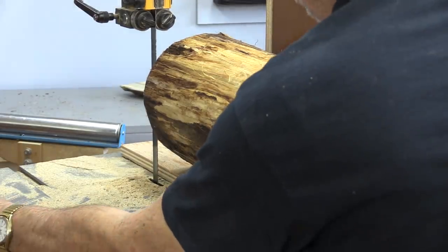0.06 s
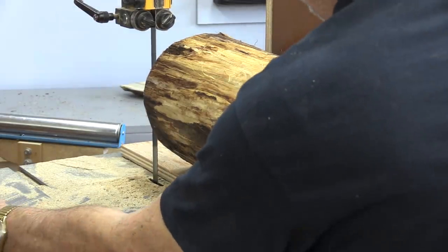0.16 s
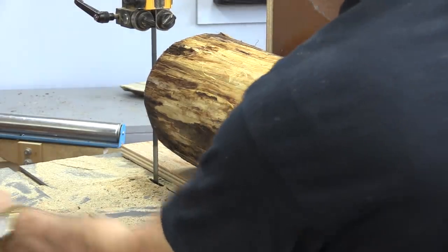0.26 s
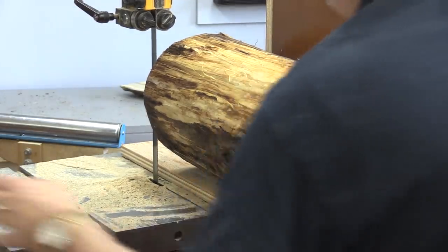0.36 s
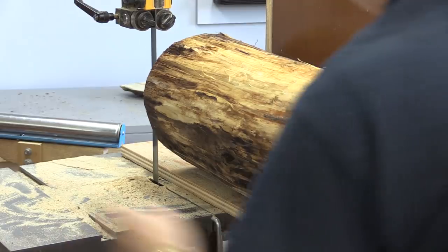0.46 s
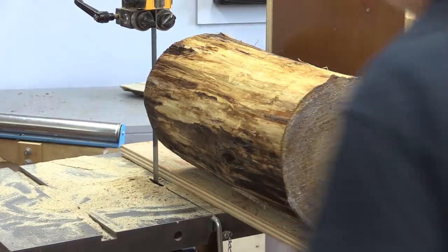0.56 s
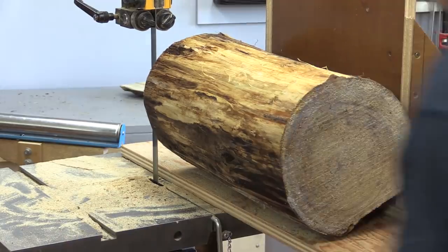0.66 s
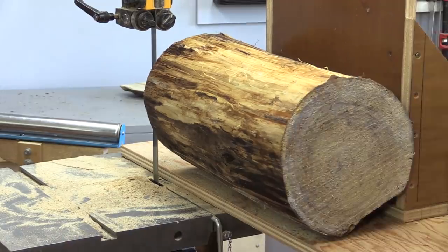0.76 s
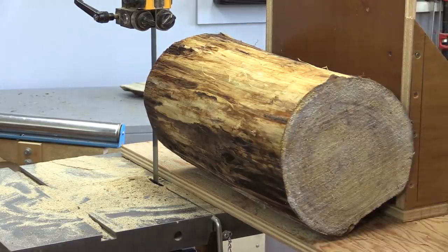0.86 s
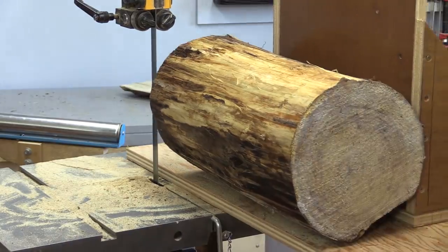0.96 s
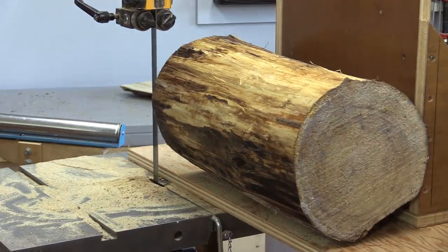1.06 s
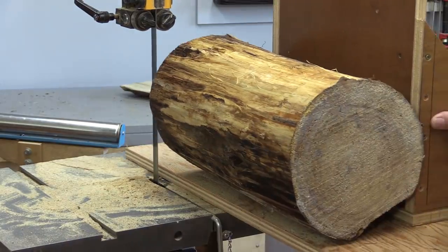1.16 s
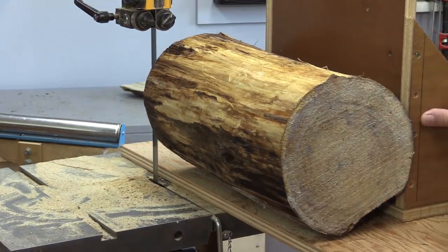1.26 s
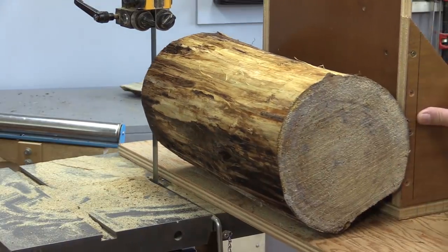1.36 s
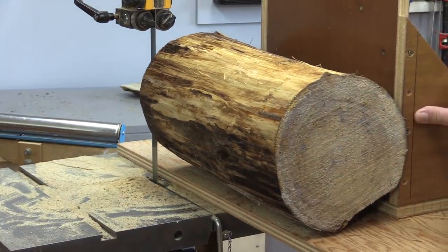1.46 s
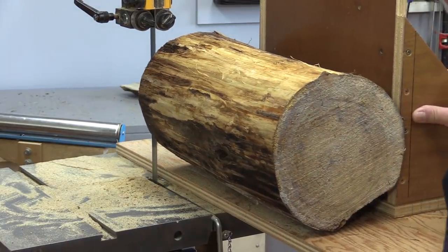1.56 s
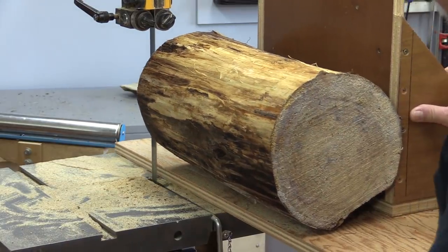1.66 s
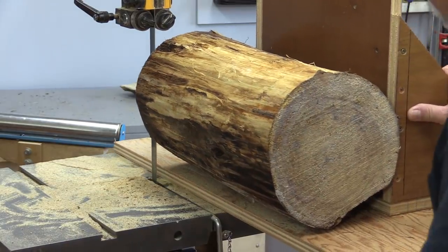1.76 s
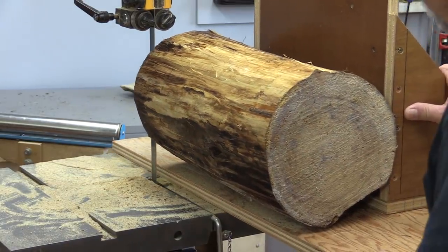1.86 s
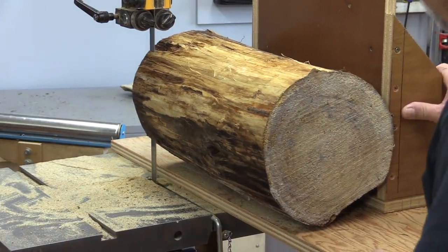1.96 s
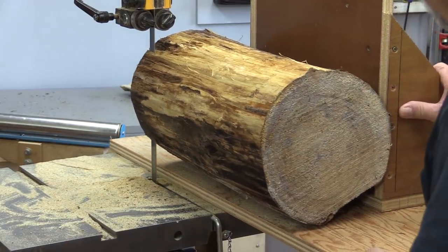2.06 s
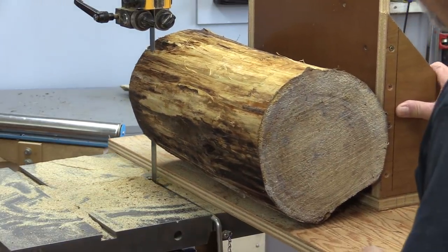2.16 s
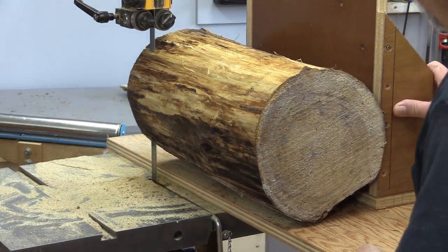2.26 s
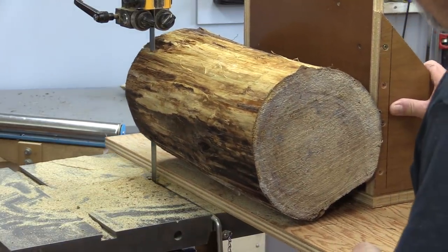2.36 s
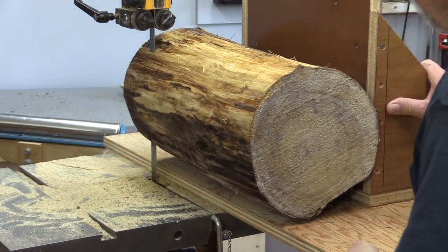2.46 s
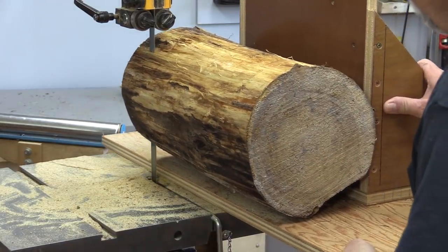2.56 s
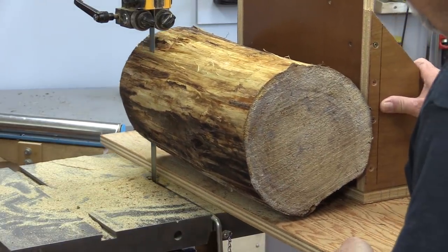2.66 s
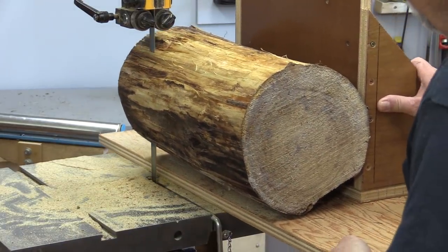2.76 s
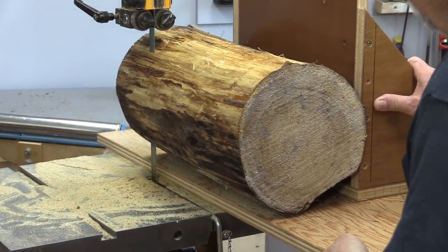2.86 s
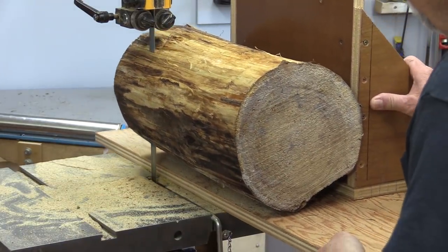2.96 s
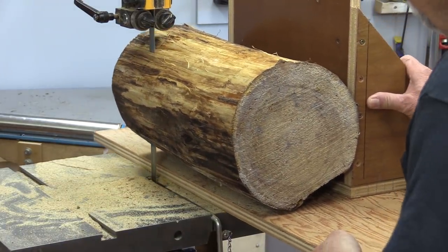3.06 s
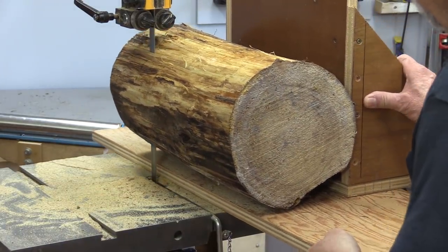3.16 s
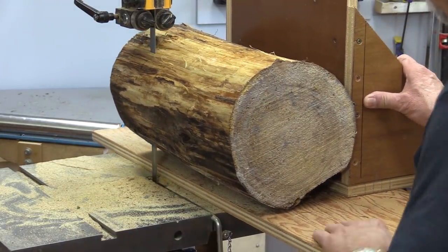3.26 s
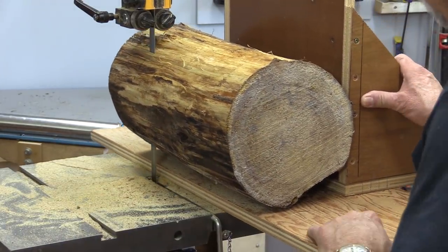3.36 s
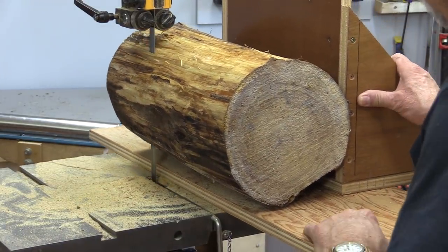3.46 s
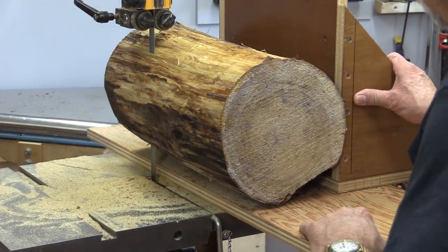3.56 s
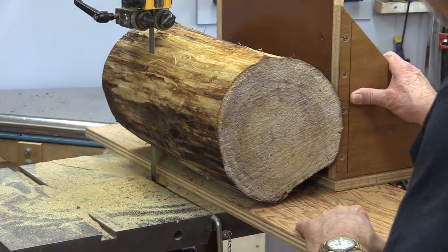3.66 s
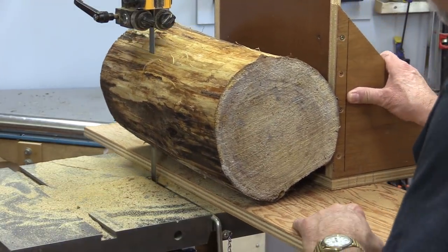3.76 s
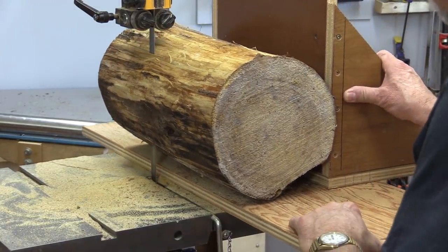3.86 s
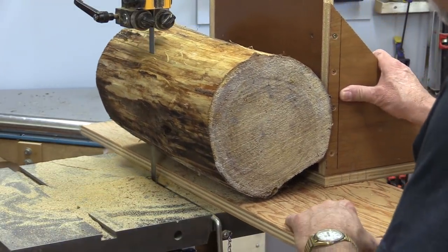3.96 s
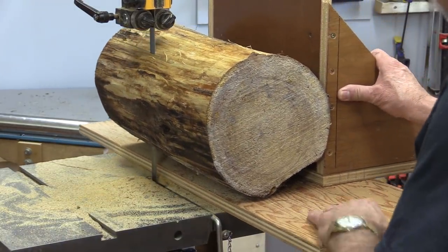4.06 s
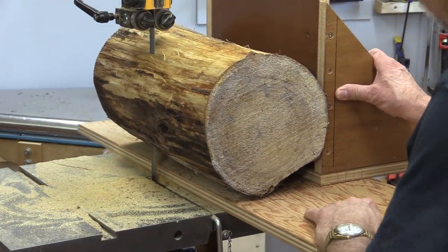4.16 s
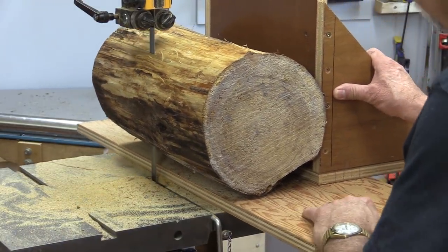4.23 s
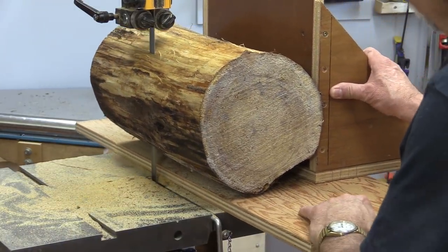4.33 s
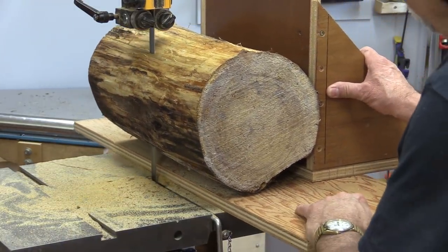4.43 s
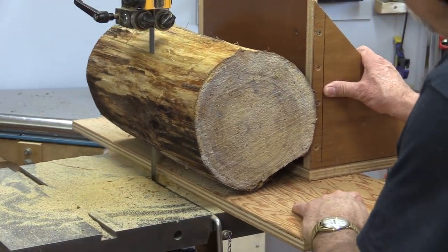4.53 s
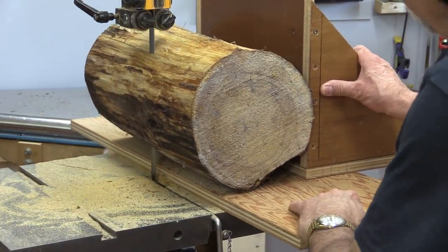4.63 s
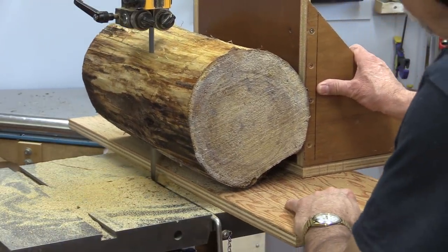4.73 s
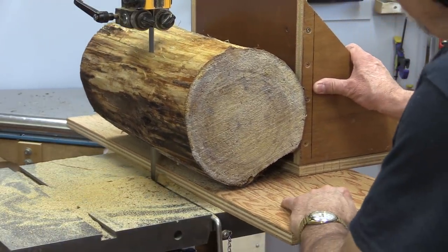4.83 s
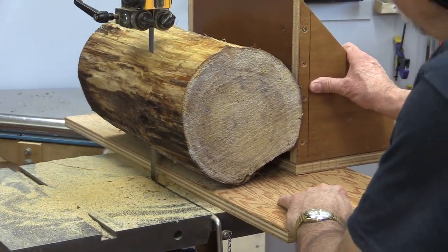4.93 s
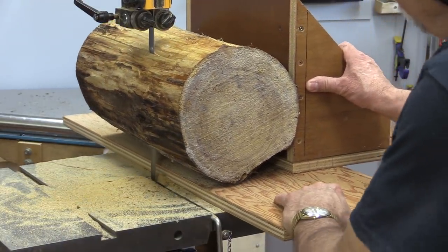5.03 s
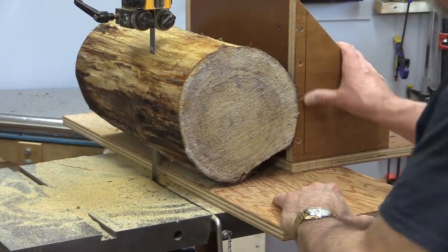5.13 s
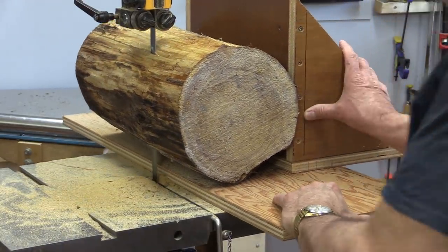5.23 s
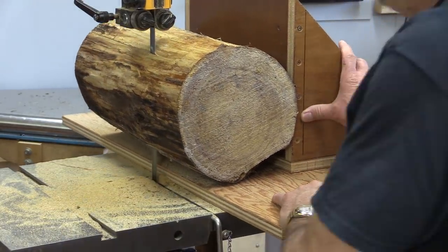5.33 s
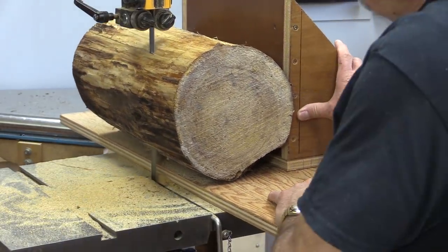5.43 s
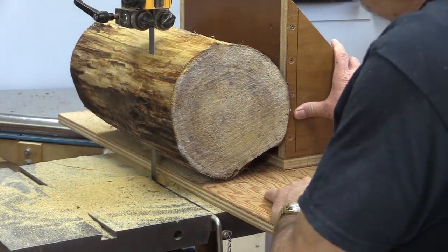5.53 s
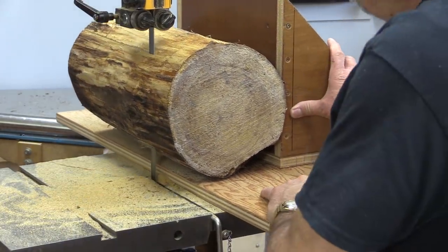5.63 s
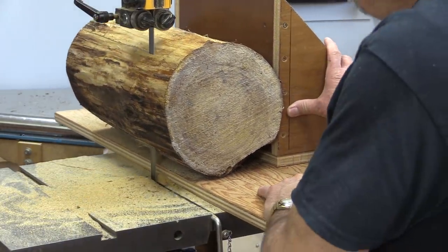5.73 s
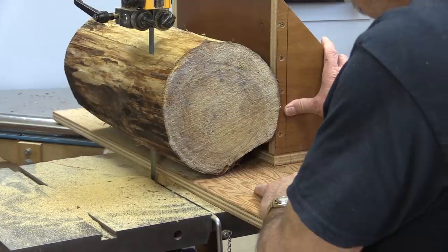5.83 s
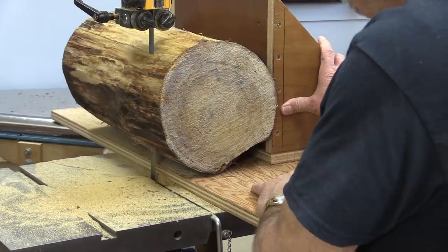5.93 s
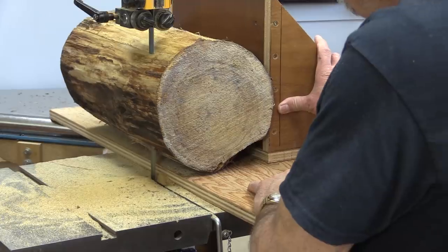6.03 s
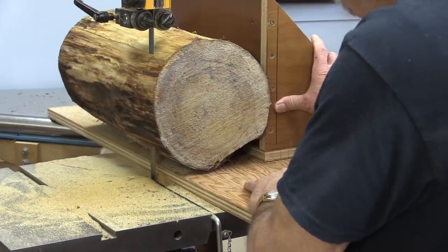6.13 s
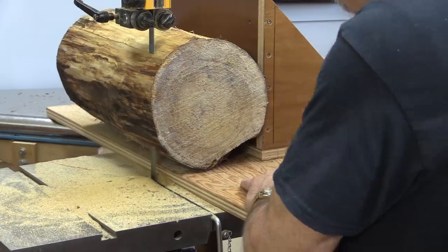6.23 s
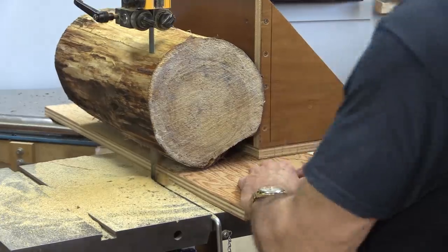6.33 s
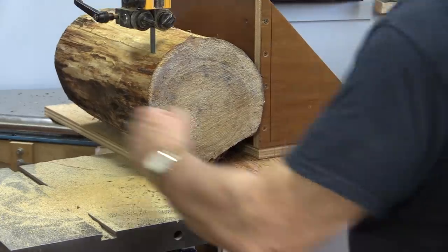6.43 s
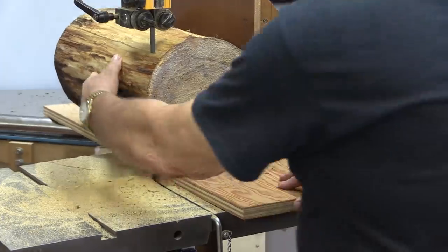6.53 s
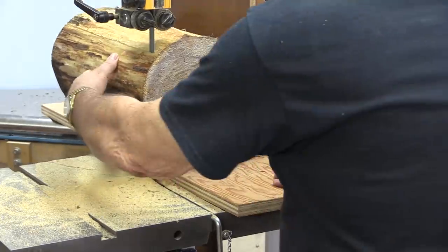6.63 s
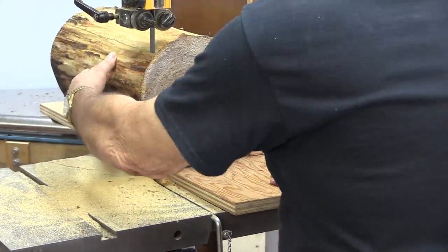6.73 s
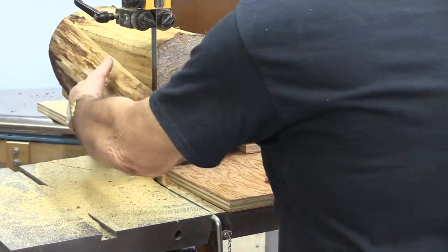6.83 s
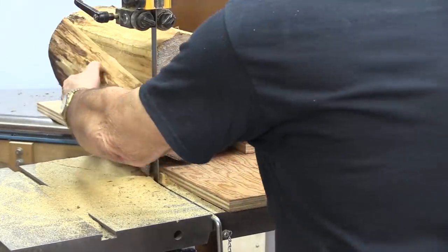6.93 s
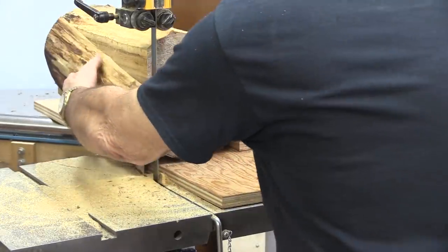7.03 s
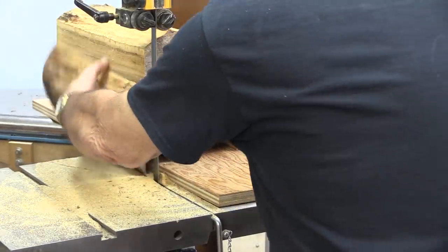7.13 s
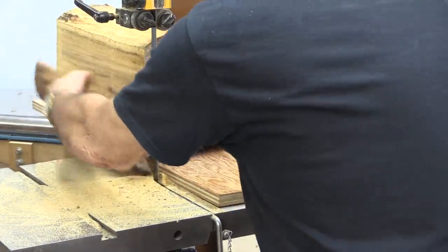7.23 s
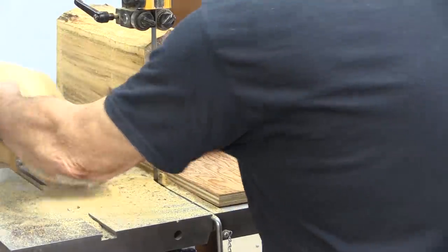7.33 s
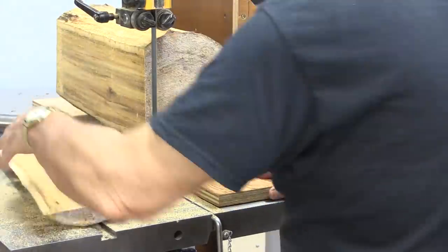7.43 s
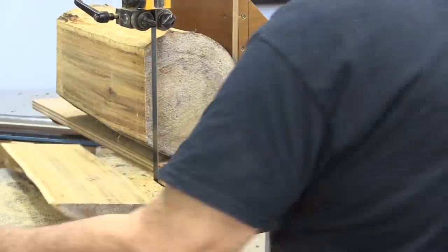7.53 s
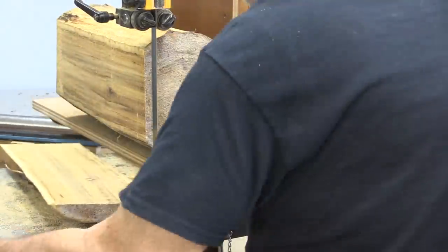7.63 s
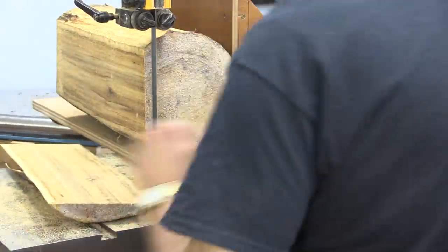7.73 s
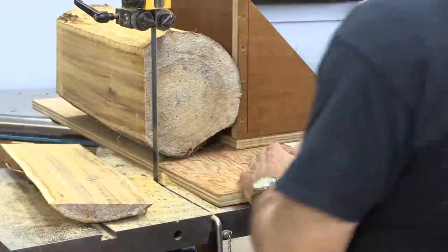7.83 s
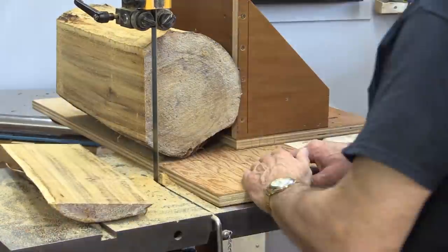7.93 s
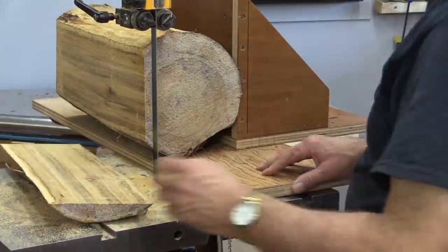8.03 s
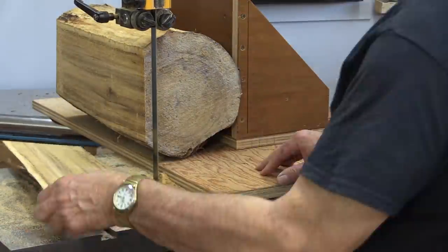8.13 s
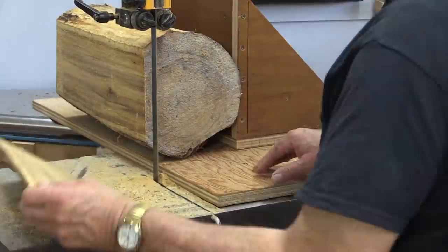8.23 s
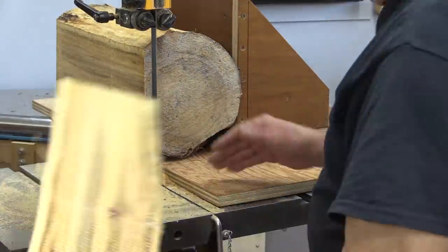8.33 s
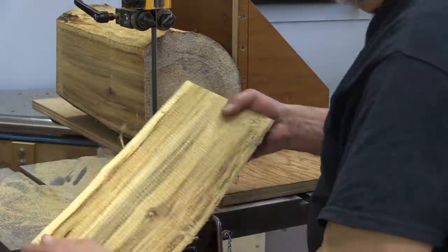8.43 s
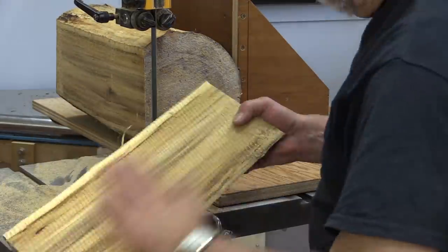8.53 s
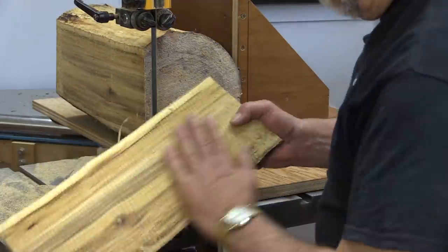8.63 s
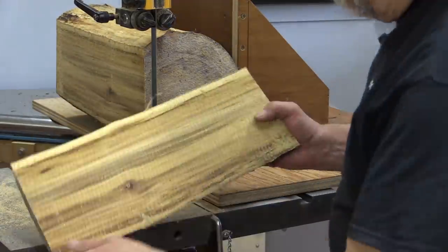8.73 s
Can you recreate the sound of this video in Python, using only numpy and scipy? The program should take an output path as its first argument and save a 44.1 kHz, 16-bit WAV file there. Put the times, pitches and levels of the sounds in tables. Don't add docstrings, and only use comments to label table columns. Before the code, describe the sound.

Switch clack, frame shudder, then a fast-forward bandsaw rip: bark snags, piercing metallic squeal, chatter and hiss, ending in a free whir and extractor whine.

```python
import sys
import numpy as np
from scipy import signal
from scipy.io import wavfile
from scipy.ndimage import uniform_filter1d

SR = 44100
rng = np.random.default_rng(int(sys.argv[2]) if len(sys.argv) > 2 else 0)


def wav_out(sig):
    wavfile.write(sys.argv[1], SR, np.round(np.clip(np.atleast_2d(sig).T, -1, 1) * 32767).astype(np.int16))


def field_ratio(decibels):
    return 10 ** (np.asarray(decibels, dtype=float) / 20)


N = 387638
T = np.arange(N) / SR
FAST_FROM_S = .995
SQUEAL_FROM_S, SEATED_S, SETTLED_S, SQUEAL_TO_S = 1.38, 2.18, 3.7, 6.875


def evened(x):
    return x / np.sqrt(np.mean(x ** 2) + 1e-20)


def read(points, hz):
    f, value = np.transpose(points)
    return np.interp(np.log(hz + 1), np.log(f + 1), value)


def columns(rows):
    s, *values = np.transpose(rows)
    gate = np.clip(np.minimum(T - s[0], s[-1] - T) / .004, 0, 1)
    return [gate] + [np.interp(T, s, v) for v in values]


def spell(start, end, edge_s):
    return np.sin(np.pi / 2 * np.clip(np.minimum(T - start, end - T) / edge_s, 0, 1)) ** 2


def spells_db(rows, edge_s):
    return sum(db * spell(start, end, edge_s) for start, end, db in rows)


def along(start, end, first, last):
    return np.interp(T, [start, end], [first, last])


def drift(rate_hz):
    step = 64
    lowpass = signal.butter(2, rate_hz, fs=SR / step, output="sos")
    slow = signal.sosfilt(lowpass, rng.standard_normal(N // step + 2))
    return np.interp(np.arange(N) / step, np.arange(len(slow)), evened(slow))


def noise(colour, patchy_db, size=1024):
    frames, hz = N // (size // 4) + 5, np.fft.rfftfreq(size, 1 / SR)
    a, b, patches = rng.standard_normal((frames, len(hz), 3)).T
    patches = uniform_filter1d(patches, size=12, axis=0)
    patches = evened(uniform_filter1d(patches, size=10, axis=1))
    z = (a + 1j * b) * field_ratio(read(colour, hz)[:, None] + patchy_db * patches)
    return evened(signal.istft(z, nperseg=size, noverlap=size * 3 // 4)[1][:N])


def resonate(x, hz, width):
    turn = np.exp(2j * np.pi * np.cumsum(hz * np.ones(len(x))) / SR)
    r = np.exp(-np.pi * abs(width) / SR)
    return 2 * (turn * signal.lfilter([1 - r], [1, -r], x / turn + 1e-18)).real


def fuzzy(hz, width):
    return evened(resonate(resonate(rng.standard_normal(N), hz, width), hz, width))


def tone(hz, db, waver_hz, waver_db, rate_hz):
    turns = np.cumsum(hz + waver_hz * drift(rate_hz)) / SR + rng.random()
    return np.sqrt(2) * field_ratio(db + waver_db * drift(rate_hz)) * np.sin(2 * np.pi * turns)


def thin(x, low_hz):
    return signal.sosfilt(signal.butter(4, low_hz, "high", fs=SR, output="sos"), x)


def add(mix, s, sound):
    part = mix[round(s * SR):][:len(sound)]
    part += sound[:len(part)]


# start_s, end_s, rise_hz, swell_db
EASES = [
    (3.26, 3.47, 38, 2),
    (4.12, 4.28, 36, 4),
    (5.16, 5.48, 42, 3),
    (6.4, 6.68, 36, 1),
    (6.74, 6.97, 10, 1),
]
EASE_S = .075
# start_s, end_s, depth_db
BREAKS = [
    (5.16, 5.22, -7),
    (5.38, 5.46, -10),
    (6.57, 6.67, -11),
]
# pitch_hz, pitch_hz
BARK_HZ = (2728, 2690)
SEATED_HZ, SETTLED_HZ = 2676, 2658
# level_db of order 1, 2, 3, 4
BARK_DB = (-53, -79, -49, -61)
SEATED_DB = (-42.5, -50, -38.5, -49.5)
DEEP_DB = (-41, -47.5, -45.5, -48.5)
# start_s, end_s, gain_db
ORDER_SPELLS = [
    [(2.16, 3.03, -6.5), (3.05, 3.2, 3), (3.25, 3.56, -4), (4.09, 4.16, -17), (4.15, 4.27, 1.5),
     (5.2, 5.42, 1.5), (5.43, 5.76, 6), (5.73, 6.3, 2.5), (6.44, 6.74, -3), (6.73, 6.9, 6), (6.77, 6.83, 4)],
    [(2.18, 2.3, 7.5), (2.28, 2.6, 3.5), (3.05, 3.55, 2), (3.55, 3.93, -4), (3.95, 4.3, 8),
     (4.36, 4.62, 7.5), (4.8, 5.2, -5), (5.2, 5.42, 6.5), (5.46, 5.53, 9), (5.58, 5.76, 7), (6.3, 6.9, 6.5)],
    [(2.14, 2.36, 6), (3.1, 3.5, 8), (4.3, 5.4, 5.5), (6.4, 6.82, 3.5)],
    [(2.18, 2.98, 5), (2.98, 3.25, -3), (3.42, 3.95, -5), (4.3, 5.15, -5), (5.45, 6.4, -5),
     (6.4, 6.62, -10), (6.68, 6.9, 0)],
]
# start_s, end_s, gain_db
FIFTH = [
    (2.18, 2.481, 4),
    (2.501, 3.2, -8),
    (3.5, 4.049, 1),
    (4.047, 4.351, 5),
    (4.7, 5.15, -6),
    (5.45, 6.699, 2),
]


def squeal_pitch():
    times = [SQUEAL_FROM_S, SEATED_S - .04, SEATED_S, SETTLED_S]
    hz = np.interp(T, times, [*BARK_HZ, SEATED_HZ, SETTLED_HZ])
    hz = hz + 3.55 * drift(44.3) + 4 * drift(2.55)
    return hz + sum(rise_hz * spell(start, end, EASE_S) for start, end, rise_hz, _ in EASES)


def squeal_levels():
    swell_db = sum(db * spell(start, end, EASE_S) for start, end, _, db in EASES)
    swell_db = swell_db + sum(db * spell(start, end, .4 * (end - start)) for start, end, db in BREAKS)
    times = [SEATED_S - .04, SEATED_S, SEATED_S + 1]
    orders = []
    for stages, spells in zip(zip(BARK_DB, SEATED_DB, DEEP_DB), ORDER_SPELLS):
        orders.append(np.interp(T, times, stages) + swell_db + spells_db(spells, .033))
    orders.append(orders[-1] - 4.0 + spells_db(FIFTH, .055))
    return [db + (k + 1) * .35 * drift(14) for k, db in enumerate(orders)]


# start_s, end_s, pitch_hz, top_db
SIDE_MODE = [
    (3.6, 4.12, 5656, -36),
    (4.62, 5.2, 5618, -50),
    (5.42, 5.7, 5650, -50),
    (5.7, 6.45, 5615, -52),
]
# start_s, end_s, pitch_hz, level_db
BEATS = [
    (3.6, 4.12, 3000, -51),
    (5.45, 6.4, 2965, -53),
]
# start_s, end_s, level_db
SUMS = [
    (4.3, 4.749, -52),
    (5.45, 6.449, -49.5),
    (6.447, 6.583, -43),
    (6.64, 6.877, -41),
]


def blade():
    hz, orders = squeal_pitch(), squeal_levels()
    squeal = np.zeros(N)
    for k, db in enumerate(orders):
        squeal += tone((k + 1) * hz, db - 1.4 * k, 1.6, 2.3, 87.0)
        squeal += (.12 + .19 * k) * field_ratio(db) * fuzzy((k + 1) * hz, 26 * (k + 1))
    out = spell(SQUEAL_FROM_S, SQUEAL_TO_S, .011) * squeal

    beating = sum(field_ratio(orders[k] - 1) * fuzzy(k * hz + CHATTER_HZ[-1], 58.7) for k in range(2, len(orders)))
    out += spell(6.69, 6.88, .042) * beating

    side = sum(field_ratio(db) * spell(start, end, .59 * (end - start)) for start, end, _, db in SIDE_MODE)
    pitch_points = [(s, mode_hz) for *span, mode_hz, _ in SIDE_MODE for s in span]
    side_hz = np.interp(T, *np.transpose(pitch_points))
    sum_tone = field_ratio(-8.0) * fuzzy(side_hz + hz, 70)
    out += side * (tone(side_hz, -.88, 11.6, .73, 37.9) + .55 * fuzzy(side_hz, 90) + sum_tone)
    for start, end, beat_hz, db in BEATS:
        out += field_ratio(db) * spell(start, end, .1) * fuzzy(beat_hz, 25)
    sums = sum(field_ratio(db) * spell(start, end, .03) for start, end, db in SUMS)
    return out + sums * fuzzy(hz + CHATTER_HZ[-1], 300) + chatter()


# start_s, pitch_hz, level_db
CLIMB = [(1.3, 2200, -51), (1.6, 2245, -42), (1.68, 2290, -40), (1.78, 2350, -41.5), (1.85, 2470, -40.5),
         (1.93, 2550, -40.5), (2.05, 2520, -41), (2.12, 2486, -37), (2.17, 2270, -45)]
# start_s, end_s, first_db, last_db
CHATTER = [(2.166, 3.301, -40.5, -36), (3.29, 3.41, -42, -44), (3.4, 4.16, -35, -38),
           (4.21, 4.701, -37.5, -30), (4.692, 4.81, -26, -37), (4.821, 5.3, -46.5, -52),
           (5.415, 6.235, -37.5, -39.5), (6.241, 6.309, -35, -34.5), (6.33, 6.389, -34, -34.5),
           (6.416, 6.462, -28, -35), (6.47, 6.568, -40, -45), (6.626, 6.68, -25.5, -32),
           (6.669, 6.716, -40, -30), (6.706, 6.868, -31.5, -23), (6.861, 6.887, -34, -44)]
CHATTER_HZ = (2252, 2255, 2255, 2258, 2258, 2230, 2260, 2220, 2210, 2215, 2310, 2200, 2205, 2208, 2208)


def chatter():
    gate, hz, db = columns(CLIMB)
    level = gate * field_ratio(db)
    for (start, end, first_db, last_db), bout_hz in zip(CHATTER, CHATTER_HZ):
        level = level + spell(start, end, .0077) * field_ratio(along(start, end, first_db, last_db))
        hz = np.where(T > start, bout_hz, hz)
    level = level * field_ratio(.6 * drift(40))

    wheel_hz, gap_at_s, gap_share, depth_db = 23.7, 4.672, .1, -11
    throb_from_s, throb_to_s = 4.4, 4.83
    turn = (wheel_hz * (T - gap_at_s) + .5) % 1 - .5
    throb = field_ratio(depth_db * spell(throb_from_s, throb_to_s, .2) * np.exp(-(turn / gap_share) ** 2))

    most = np.where(T > 6.2, .9, .6 + .25 * spell(throb_from_s, throb_to_s, .1))
    locked = np.clip((20 * np.log10(level + 1e-9) + 41) / 9, 0, most)
    seated = np.clip((T - 2.1) / .08, .6, 1)
    loose = seated * (.3 * fuzzy(hz, 70) + .62 * tone(hz, 0, 38, 2.5, 110))
    loose = loose + (1.25 - .7 * seated) * fuzzy(hz, 230)
    body = np.sqrt(1 - locked) * loose + np.sqrt(locked) * tone(hz, 0, 12.66, .48, 45.4)
    return throb * level * (body + field_ratio(-18.5) * fuzzy(2 * hz, 140))


# start_s, bite_db
CUT = [(1.3, -64), (1.4, -59), (1.63, -54), (1.99, -46), (2.14, -45.5), (2.2, -41), (3.02, -42.5),
       (3.26, -41.5), (4.09, -43.5), (4.59, -41.5), (5.06, -43.5), (5.21, -42.5), (6.35, -43.5),
       (6.54, -41.5), (6.87, -40), (6.88, -57), (6.9, -52)]
# pitch_hz, level_db (per Hz)
CUT_COLOUR = [(290, -100), (500, -15), (649, -65), (944, -14.5), (1240, -11.5), (1390, -65), (1760, -12),
              (2250, 4.5), (2520, -9.5), (2900, -7), (3420, -3), (3780, -9.5), (4950, -10), (6270, -9),
              (7780, -6.5), (9120, -14.5), (15800, -26.5)]
# pitch_hz, width_hz, level_db
KERF = [(4970, 250, -14), (5790, 110, 2), (6400, 240, -15), (7900, 130, 0.5), (7340, 59, 1),
        (8290, 110, 0.5), (8670, 140, 2), (10140, 170, 3), (10540, 200, -22), (12900, 300, -3),
        (13900, 200, -5)]
# start_s, level_db
RING = [(1.4, -64), (1.65, -46), (2.13, -42), (2.2, -32.5), (2.6, -37), (2.98, -38), (3.15, -45),
        (3.3, -38), (3.5, -43), (3.85, -39.5), (4.2, -48), (4.5, -40), (5.0, -43), (5.45, -39), (6.3, -37),
        (6.55, -34), (6.88, -45)]
# start_s, level_db
ENTRY = [(1.45, -51), (1.75, -45), (2.3, -47), (2.7, -50), (4, -53)]
# start_s, end_s, level_db
RASPS = [
    (1.634, 1.66, -48),
    (1.72, 1.8, -47),
    (1.82, 1.904, -47),
    (1.96, 1.998, -42),
    (2.033, 2.15, -48),
]


def cut():
    gate, bite_db = columns(CUT)
    bright_db = -3 + 3 * np.minimum(bite_db + 43, 0) + 20 * np.log10(feed())
    bright_db = bright_db + 2.2 * sum(spell(start, end, EASE_S) for start, end, *_ in EASES)
    easing = sum(spell(start, end, EASE_S) for start, end, *_ in EASES[:3])
    ring_db = columns(RING)[1] - 2 * easing + .67 * drift(25)

    grains = field_ratio(2.8 * np.minimum(rng.exponential(1, N // 16 + 1), 5) / 2).repeat(16)[:N]
    hiss = evened(noise(CUT_COLOUR, 1.2, size=512) * uniform_filter1d(grains, size=12))
    top = signal.sosfilt(signal.butter(2, 9500, "high", fs=SR, output="sos"), hiss)
    hiss = hiss + (field_ratio(bright_db + 12.0) - 1) * top
    rings = evened(sum(field_ratio(db + 1.6 * drift(3.0)) * fuzzy(hz, 2.2 * width) for hz, width, db in KERF))
    sound = field_ratio(bite_db + 7.0) * hiss + field_ratio(bite_db - 1.0) * rings + field_ratio(ring_db - 3.5) * kerf_ring()

    entering, entry_db = columns(ENTRY)
    sound += entering * field_ratio(entry_db) * (fuzzy(3860, 230) + .56 * fuzzy(3560, 900))
    rasp = sum(field_ratio(db) * spell(start, end, .012) for start, end, db in RASPS)
    sound += rasp * field_ratio(3 * drift(60)) * fuzzy(7200, 600)
    return thin(gate * field_ratio(.96 * drift(28)) * sound, 520)


def kerf_ring():
    broad = np.interp(T, [3, 3.5, 4.8, 5.4], [.8, .5, .55, .8]) * fuzzy(3390, 240)
    lower = .55 * tone(3345 + 12 * drift(3), 0, 40, 4, 60)
    upper = .35 * tone(3460 + 15 * drift(3), 0, 50, 4, 60)
    return broad + lower + upper


# start_s (centre), depth_db, length_s
PAUSES = [
    (3.06, -3.5, .03),
    (5.41, -6, .018),
    (6.432, -3, .012),
    (6.6, -9, .026),
]


def feed():
    return field_ratio(sum(db * np.exp(-((T - s) / length) ** 4) for s, db, length in PAUSES))


# start_s, peak_db, pitch_hz, length_s
SNAGS = [(1.38, -30, 8180, 0.024), (1.638, -26, 7200, 0.014), (1.724, -25, 7400, .01),
         (1.743, -24, 7300, 0.01), (1.765, -22, 7600, .008), (1.807, -23, 7500, .008),
         (1.835, -18, 7700, .01), (1.878, -22, 7400, .008), (1.895, -18, 8000, 0.009),
         (1.919, -7.5, 7700, 0.019), (1.961, -11, 7600, 0.013), (2.005, -9, 7600, 0.011),
         (2.042, -19, 7600, .009), (2.063, -23, 7400, .008), (2.097, -14, 7900, 0.011)]
SNAG_ORDERS = [(1, .8), (3, 1), (4, .8), (5, .6), (6, .35)]


def snags():
    out = np.zeros(N)
    for s, db, hz, length in SNAGS:
        u = np.arange(2000) / SR / length
        puff = rng.standard_normal(2000) * np.sqrt(u) * np.exp(-u ** 4)
        ring = sum(share * resonate(puff, hz * k / 3, 400) for k, share in SNAG_ORDERS) + .054 * puff
        add(out, s, field_ratio(db - 12.5) * ring / abs(ring).max())
    return thin(out, 1400)


# start_s, pitch_hz, level_db
SLACK = [(6.592, 2470, -41), (6.603, 2410, -35), (6.625, 2330, -37), (6.64, 2290, -48)]


def slack():
    gate, hz, db = columns(SLACK)
    pair = tone(hz, -2, 15, 1.5, 60) + tone(2 * hz, -8, 40, 1.5, 60)
    return gate * field_ratio(db) * (pair + .3 * fuzzy(2 * hz, 200))


# start_s, level_db
MOTOR = [(1.0, -57), (1.2, -45.5), (5.07, -49), (5.32, -46), (7.17, -42.5), (7.7, -41.5), (7.73, -66),
         (8.0, -46.5), (8.79, -53)]
WHINE = [(1.1, -63), (1.5, -55), (1.72, -46.5), (2.6, -45.5), (3.2, -52), (3.9, -61), (4.15, -52),
         (5.1, -57), (5.3, -47), (5.6, -58), (6.25, -56), (6.4, -43.5), (6.86, -44), (6.92, -47),
         (7.4, -47), (7.84, -56)]
RUSH = [(.997, -52), (1.1, -45), (1.4, -50), (6.9, -43), (7.7, -43.5), (8.3, -48), (8.79, -45.5)]
# pitch_hz, level_db (per Hz)
RUSH_COLOUR = [(250, -62), (450, -11.5), (900, -0.5), (1400, -1.5), (1900, -2.5), (2300, 7), (2700, -1.5),
               (3900, 0), (4800, -7), (7000, -9.5), (9000, -9), (11500, -12.5), (15800, -20)]
# pitch_hz, level_db
FRAME = [(580, -81), (3620, -65.5), (4060, -57), (5030, -60), (5507, -62), (5985, -58.5), (7103, -64)]
# start_s, level_db
RUNNING = [(.995, -10), (1.12, 1), (7.68, -0.5), (7.85, -13)]
# start_s, level_db
TABLE = [(1, -87), (2.9, -84), (3.3, -78), (6.6, -72.5), (8, -82), (8.5, -82), (8.79, -80)]
# start_s, pitch_hz, level_db
RUN_IN = [(.995, 4330, -45), (1.05, 4400, -46), (1.1, 4500, -47), (1.13, 4520, -62)]
RUN_DOWN = [(7.689, 4520, -49), (7.73, 4420, -51), (7.77, 4300, -57), (7.85, 4250, -63)]
# start_s, level_db
SPAN = [(1.0, -59), (1.15, -48.5), (1.6, -54), (2.1, -59), (6.87, -52.5), (6.9, -52), (7.2, -52),
        (8.79, -55.5)]
# pitch_hz, width_hz
SPAN_MODES = [(2085, 160), (2422, 170), (1653.5, 32)]


def saw():
    out = run_up()
    motor_hz = 959.4
    gate, db = columns(MOTOR)
    out += gate * (.55 * tone(motor_hz, db, .58, 2.4, 28.0) + .16 * field_ratio(db) * fuzzy(motor_hz, 28))
    gate, db = columns(RUNNING)
    out += gate * field_ratio(db) * sum(tone(hz, line_db, 2.86, .44, 9.3) for hz, line_db in FRAME)
    gate, db = columns(TABLE)
    out += gate * (tone(309.5, db, 3.7, 2.8, 5.6) + tone(340, db, 3.26, 1.0, 3.7))

    gate, hz, db = columns(RUN_IN)
    upper = fuzzy(hz, 110) + .7 * fuzzy(.88 * hz, 130)
    lower = .8 * fuzzy(.485 * hz, 120) + .6 * fuzzy(.56 * hz, 120)
    out += gate * field_ratio(db) * (upper + lower)
    gate, hz, db = columns(RUN_DOWN)
    out += gate * (tone(hz, db, 5.7, 1.5, 30) + .52 * field_ratio(db) * fuzzy(.5 * hz, 200))

    gate, db = columns(WHINE)
    load = np.interp(T, [1.6, 2.2, SQUEAL_TO_S, SQUEAL_TO_S + .04], [0, 1, 1, 0])
    whine_hz = 4552 - 36 * load + 6 * drift(3.06)
    powered = T < RUN_DOWN[0][0]
    out += gate * powered * tone(whine_hz, db + .37 * drift(.8), 6.1, 1.2, 25)
    gate, db = columns(SPAN)
    out += gate * field_ratio(db) * sum(fuzzy(hz, width) for hz, width in SPAN_MODES)
    gate, db = columns(RUSH)
    return out + gate * field_ratio(db + 1.2 * drift(30)) * noise(RUSH_COLOUR, 1.5)


# pitch_hz, level_db (per Hz)
RUMBLE = [(47, -54), (80, -41), (242, -6.5), (459, -34), (699, -9), (834, -15), (1090, -14), (2260, -27),
          (3290, -22.5), (3750, -28.5), (15800, -44)]
# start_s, end_s, level_db
SHUDDER = [
    (0.29, .75, -54.5),
    (0.783, 1.005, -43.5),
]
# start_s, end_s, from_hz, to_hz, top_db
SWEEPS = [(.48, 0.751, 675.7, 731, -38.5), (.6, 0.79, 1450, 1500, -46.5), (0.75, 0.823, 666, 650, -44),
          (0.788, 0.86, 925, 992, -38), (0.852, 0.922, 930, 983, -43), (0.87, 0.934, 1040, 1110, -42),
          (.92, 1.0, 1075, 1090, -44), (.66, .86, 1357, 1406, -48), (0.892, 1.023, 550, 505, -41)]


def run_up():
    shudder = sum(field_ratio(db) * spell(start, end, .026) * along(start, end, 1.46, .24)
                  for start, end, db in SHUDDER)
    out = noise(RUMBLE, 1.4) * shudder
    for start, end, from_hz, to_hz, db in SWEEPS:
        hz = along(start, end, from_hz, to_hz)
        level = field_ratio(db) * spell(start, end, .16 * (end - start)) * along(start, end, .62, .78)
        out += level * (.47 * fuzzy(hz, 64) + tone(hz, -2, 7.8, 1.6, 30))
    return out * (T < FAST_FROM_S)


# start_s, peak_db
SWITCH_ON = [
    (0.109, -20),
]
SWITCH_OFF = [
    (7.675, -19),
]
# pitch_hz, level_db, t60_s
SWITCH_MODES = [(750, -31, 0.031), (1137, -3, 0.15), (1330, 0.5, 0.081), (1500, -1, 0.071),
                (1870, -25, 0.098), (2121, -25, 0.038), (3020, -21, 0.016), (3820, -13, 0.22)]
# pitch_hz, level_db (per Hz)
CRACK = [(290, -45), (500, -1), (1300, -2.5), (4500, -9.5), (6450, -24), (11800, -17), (15800, -31)]
# start_s, peak_db, pitch_hz, t60_s
KNOCKS = [
    (.767, -24.5, 657, 0.093),
    (.793, -32, 680, 0.076),
    (7.315, -44, 4100, .12),
    (7.468, -33, 2070, .1),
    (7.47, -36, 1690, .1),
    (7.675, -32, 3000, 0.039),
    (7.675, -28, 4840, .04),
]
# start_s, peak_db, pitch_hz (centre)
TICKS = [(0.806, -39, 8000), (.81, -38, 3600), (7.2315, -37, 9700), (7.283, -38, 10500),
         (7.2885, -28, 9480), (7.311, -27.5, 9500), (7.312, -31, 6200), (7.3537, -36, 8560),
         (7.4766, -30, 9400), (7.7174, -34, 9600), (7.8194, -38, 9360), (7.9848, -35, 9170),
         (8.079, -37, 8570), (8.11, -39, 8740), (8.4265, -37, 8820)]


def clicks():
    out, t = np.zeros(N), np.arange(8192) / SR
    body = sum(field_ratio(db - 60 * t / t60) * np.sin(2 * np.pi * hz * t) for hz, db, t60 in SWITCH_MODES)
    body = body / abs(body).max()
    crack = noise(CRACK, 0)[:8192] * (field_ratio(-60 * t / .024) + field_ratio(-3.5 - 60 * t / .25))
    for s, db in SWITCH_ON:
        add(out, s, field_ratio(db) * (.69 * body + .27 * crack))
    for s, db in SWITCH_OFF:
        fast = (.98 * body + .35 * crack)[::4] + .14 * crack[::2][:2048]
        add(out, s, field_ratio(db) * thin(fast, 800))
    for s, db, hz, t60 in KNOCKS:
        add(out, s, field_ratio(db - 60 * t / t60) * np.minimum(t / .0012, 1) * np.sin(2 * np.pi * hz * t))
    for s, db, hz in TICKS:
        puff = rng.standard_normal(8192)
        tick = resonate(puff, hz, 2200) + .6 * resonate(puff, 1.38 * hz, 2200) + .12 * puff
        tick = thin(tick, .3 * hz) * field_ratio(-60 * t / .06)
        add(out, s, field_ratio(db) * tick / abs(tick).max())
    return thin(out, 140)


# pitch_hz, level_db (per Hz)
AIR_SLOW = [(24, -60), (40, -33), (85, -41), (114, -24), (147, -12.5), (289, -7.5), (476, -8), (693, -5.5),
            (935, -13.5), (1090, -10), (1170, -15.5), (1580, -14.5), (1980, -18.5), (2420, -22),
            (15800, -48.5)]
AIR_FAST = [(71, -88), (120, -68), (226, -24.5), (272, -80), (333, -18.5), (400, -27.5), (540, -3.5),
            (667, -34), (709, -24), (754, -14.5), (802, -1.5), (1390, -5.5), (1540, -3), (2900, -8),
            (3280, -9), (8560, -13.5), (15800, -25.5)]
# pitch_hz, level_db
TONES_SLOW = [(296.1, -60), (355.3, -53.5), (624.5, -53), (709.4, -43.5), (1330, -67), (1534, -65),
              (2121, -67), (2460, -67)]
TONES_FAST = [(236.9, -73.5), (473.7, -64), (710.6, -63.5), (823.6, -61.5), (947.5, -69), (1421, -51),
              (1653, -65), (1895, -57.5), (2132, -57), (2842, -50), (3090, -58.5), (4264, -56), (4737, -67),
              (5685, -64.5)]
# level_db of order 1, 2, 3
FAN_DB = (-56, -43.5, -62)
# start_s, end_s, change_db of order 1, 2, 3
LEANS = [(4.3, 8.704, 1.5, -2, -2), (5.7, 6.27, 0, 4, -6), (6.3, 8.502, 6, -3, 3), (3.3, 8.7, -0.5, -2, 8),
         (5.33, 7, -0.5, -9, -2), (6.5, 9.7, -1, -1, 0), (6.8, 8.0, -4, 2, -0.5), (7.7, 8.9, 1.5, -1, -1.5),
         (7.7, 8.75, -5, 0.5, 0.5), (7.72, 7.9, -6, 0.5, 0.5)]


def extractor():
    slow = field_ratio(-38 - 4.0) * noise(AIR_SLOW, .5, size=2048)
    slow = slow + sum(tone(hz, db, 1.67, .79, 9.1) for hz, db in TONES_SLOW)
    slow = slow + tone(1066, -52 - 10 * spell(.56, 1.1, .08), 2.5, 1.4, 12)
    slow = slow + tone(59.2, -77, .3, 1.1, 4) + tone(118.4, -62.0, .55, 2.4, 4.9)

    fan_hz = 1420.6
    fast = field_ratio(-42.5 - 1.5) * noise(AIR_FAST, 1.4)
    for k, db in enumerate(FAN_DB):
        shade_db = sum(change_db[k] * spell(start, end, .11) for start, end, *change_db in LEANS)
        fast = fast + tone((k + 1) * fan_hz, db + shade_db, .83, .52, 21.0)
    others = [(hz, db) for hz, db in TONES_FAST if abs(hz / fan_hz % 1 - .5) < .47 or hz > 5000]
    fast = fast + sum(tone(hz, db, .59, 1.0, 11.6) for hz, db in others)
    return np.where(T < FAST_FROM_S, slow, fast)


def scene():
    sawing = feed() * (cut() + blade()) + slack() + snags()
    return np.tile(extractor() + saw() + sawing + clicks(), (2, 1))


def top_cut(x):
    return signal.sosfilt(signal.butter(12, 16800, fs=SR, output="sos"), x)


def record(dry):
    edge = signal.firwin(2047, 15770, window=("kaiser", 9), fs=SR)
    return top_cut(signal.oaconvolve(dry, edge[None], "same"))


dry = scene()
out = record(dry)
wav_out(out)
```